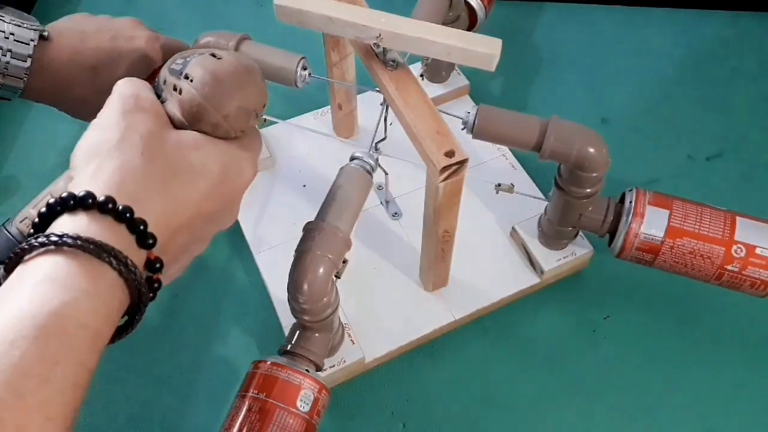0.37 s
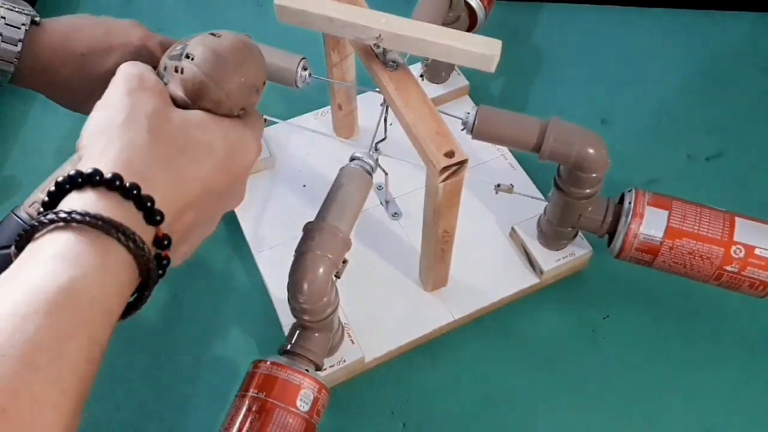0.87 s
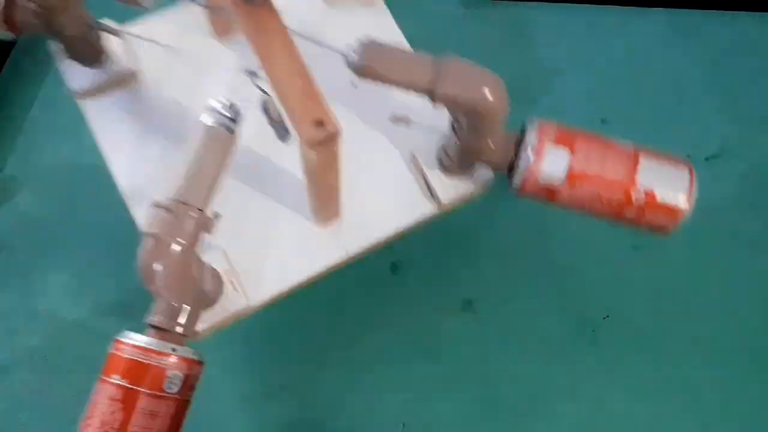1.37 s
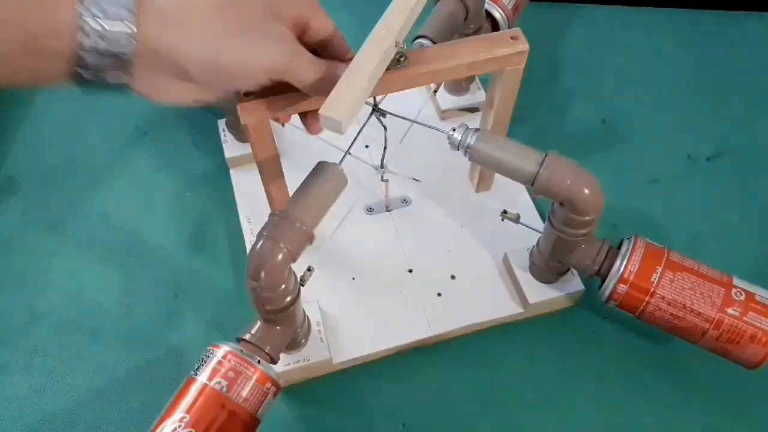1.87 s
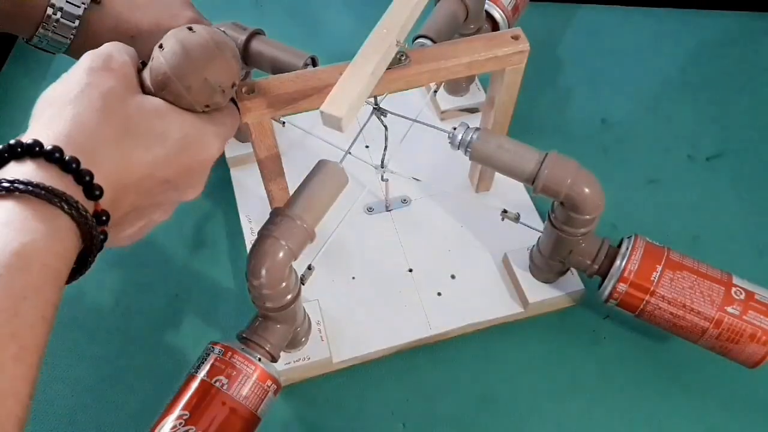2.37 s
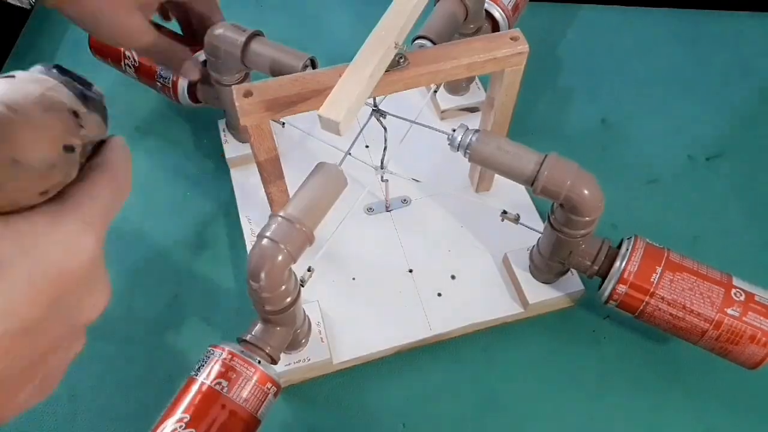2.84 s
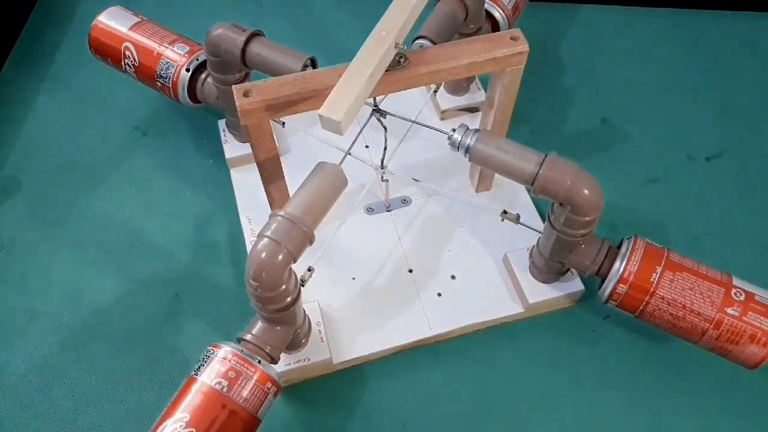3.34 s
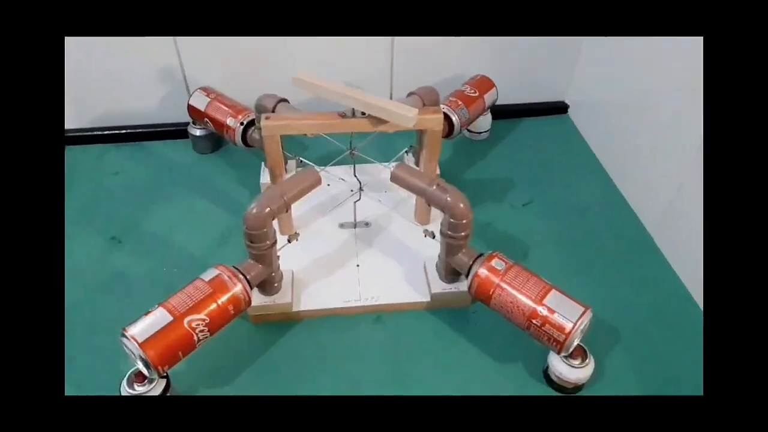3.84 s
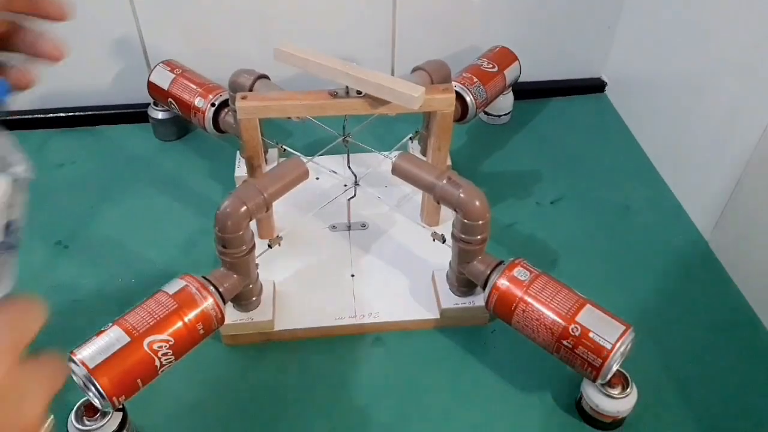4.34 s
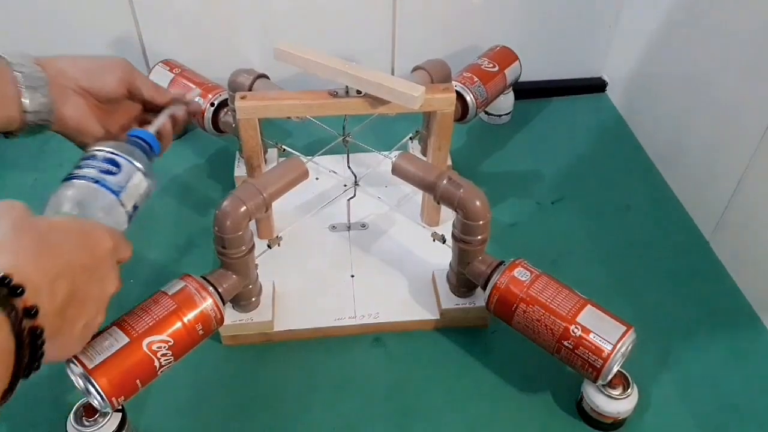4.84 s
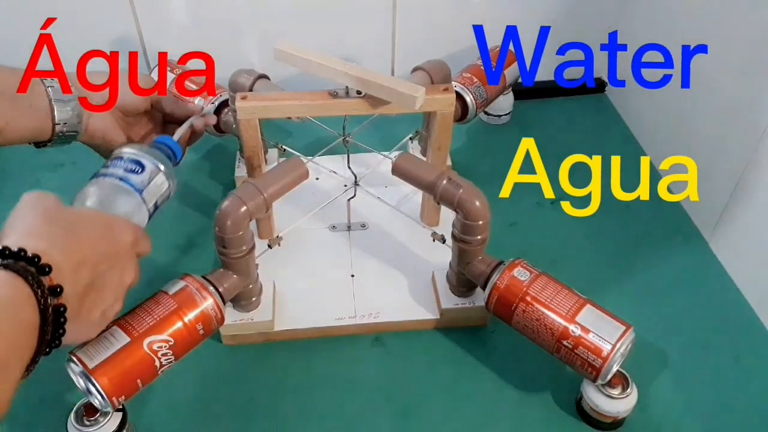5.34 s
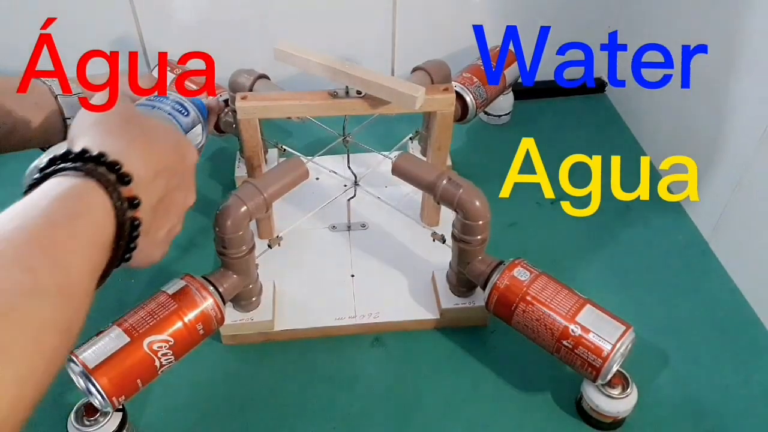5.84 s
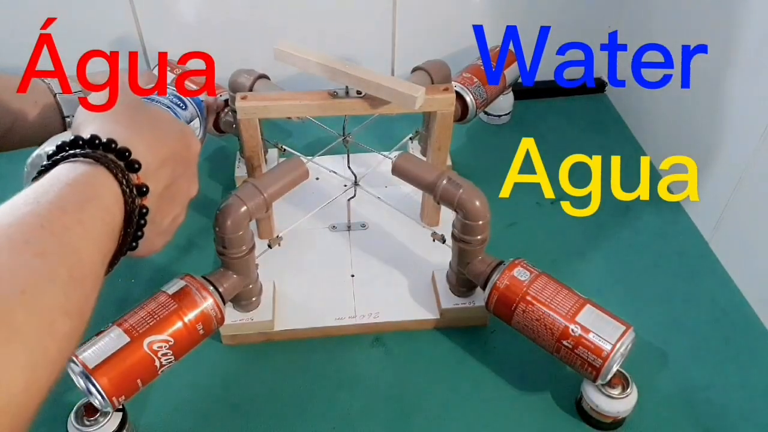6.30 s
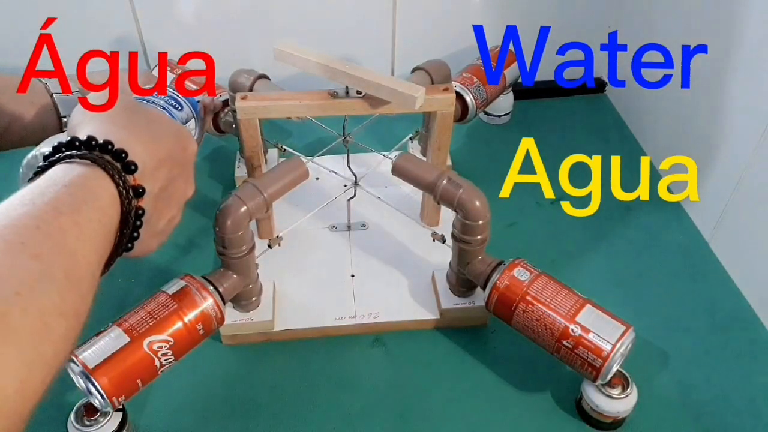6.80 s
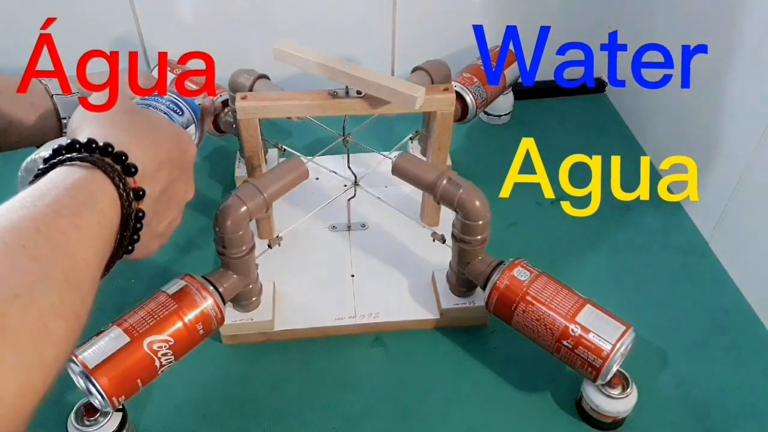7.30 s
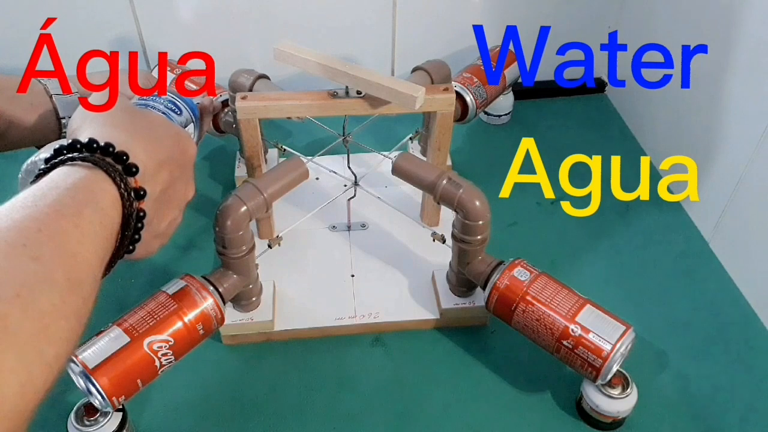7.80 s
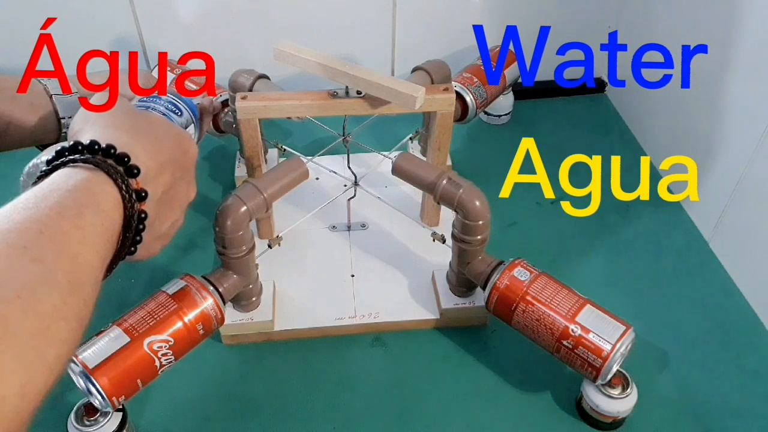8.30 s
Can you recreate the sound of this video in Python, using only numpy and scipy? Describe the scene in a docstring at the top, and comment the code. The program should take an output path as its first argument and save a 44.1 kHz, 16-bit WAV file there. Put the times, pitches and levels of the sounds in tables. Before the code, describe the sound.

A shrill little rotary drill with a gritty, hissing cut works three times close to the microphone, with light handling scuffs between. A blink of complete silence cuts to a steady, faint far machine hum. Thin plastic clicks, crackles and hollow can taps sound in sparse clusters, with a short hard-room tail; one arching, hoarse, distant animal call rises and falls, and a few last clicks follow.

```python
"""A small fast hand drill, already running, works three times at a bench in a hard-walled workshop.
Its whine and cutting noise are summed tones and shaped noise; between bursts, soft noise swells are things being shifted.
After a very short silence a machine hums: regular strokes ring its casing. Over it a thin plastic bottle
crackles and taps a can, made of noise bursts that die away, and far off an animal cries in three gliding tones."""
import sys
import numpy as np
from scipy import signal
from scipy.fft import rfft, irfft, next_fast_len
from scipy.io import wavfile
from scipy.ndimage import uniform_filter1d

SR = 44100
rng = np.random.default_rng(int(sys.argv[2]) if len(sys.argv) > 2 else 0)


def invert_db(x):
    """Field ratio 10**(x/20) for x, a level in decibels (scalar or array-like)."""
    u = np.asarray(x, float) / 20
    return 10 ** u


def materialize(psi):
    """Save the field psi as 16-bit PCM at rate SR to the path in sys.argv[1].

    A 1-D psi becomes a single channel; in a 2-D psi each row is a channel.
    """
    bounded = np.clip(np.atleast_2d(psi).T, -1, 1)
    quanta = np.round(bounded * 32767).astype(np.int16)
    wavfile.write(sys.argv[1], SR, quanta)


N = 371322
T = np.arange(N) / SR
# the short silence: (start [s], end [s], fade [s])
SILENCE = (3.492, 3.522, 0.0018)


def curve(rows, empty=-120.):
    """Draw straight lines through the columns of a table against time."""
    s, *columns = np.transpose(rows)
    return [np.interp(T, s, column, left=empty, right=empty) for column in columns]


def unit(x):
    """Scale a sound to an rms of 1."""
    return x / np.sqrt(np.mean(x ** 2))


def colour(x, points):
    """Make each pitch region louder or softer, by (frequency [Hz], gain [dB]) points."""
    hz, db = np.transpose(points)
    size = next_fast_len(N)
    f = np.maximum(np.arange(size // 2 + 1) * SR / size, 1)
    gain = invert_db(np.interp(np.log(f), np.log(hz), db))
    return irfft(rfft(x, size) * gain, size)[:N]


def band(x, hz, width_hz):
    """Pass a sound through one resonance with gain 1 at its centre."""
    return signal.lfilter(*signal.iirpeak(hz, hz / width_hz, fs=SR), x)


def rough_note(hz, width_hz):
    """Noise through two resonances at one pitch: the narrower they are, the more it sounds like a note."""
    once = band(rng.standard_normal(N), hz, width_hz)
    return unit(band(once, hz, 0.72 * width_hz))


def walk(rate):
    """Random wandering with an rms of 1: levels held for 1 / rate seconds, then smoothed twice."""
    hold = int(SR / rate)
    steps = np.repeat(rng.standard_normal(N // hold + 1), hold)
    smooth = uniform_filter1d(uniform_filter1d(steps, hold), hold)
    return unit(smooth[:N])


def bump(s, length):
    """Smooth swell and fade around the moment s."""
    return np.sin(np.pi * np.clip((T - s) / length + .5, 0, 1)) ** 2


def decay(s, t60):
    """Sudden start at s, then a fade that falls 60 dB in t60 seconds."""
    onset = np.clip((T - s) / 0.00082, 0, 1)
    return np.exp(-np.log(1000) * np.maximum(T - s, 0) / t60) * onset


def ripple(x, t60):
    """Smear a sound with a dense random tail that dies within t60 seconds, at equal power."""
    lag = np.arange(int(t60 * SR)) / SR
    tail = rng.standard_normal(len(lag)) * np.exp(-np.log(1000) * lag / t60)
    return signal.fftconvolve(x, tail / np.linalg.norm(tail))[:N]


def contacts(shapes, levels_db, ranges):
    """Bursts of noise as things touch, each with its own balance of low, middle and high."""
    return sum((invert_db(db) @ shapes) * rough_note(hz, width)
               for db, (hz, width) in zip(np.transpose(levels_db), ranges))


def room_air():
    """Wavering rumble and hiss: shaped noise, with another colour after the silence."""
    # rumble before and after the silence: (time [s], level [dB])
    rumble_before = [(0, -59), (.4, -55), (.7, -61), (.94, -56.5), (1.24, -60.5), (2.3, -59), (2.58, -59),
                     (2.73, -65), (3.1, -61.5), (3.5, -62)]
    rumble_after = [(3.52, -58.5), (3.8, -54), (4.3, -55), (6, -56), (6.35, -55), (6.6, -56), (7.1, -57),
                    (8.42, -56)]
    # balance of the noise before and after: (frequency [Hz], relative level [dB])
    air_before = [(20, -39), (50, -18), (95, -22), (125, -3.5), (280, -5), (600, -21), (1100, -31.5),
                  (2400, -39.5), (3500, -36.5), (3800, -27.5), (4600, -35), (5400, -34.5), (9000, -35),
                  (15500, -45)]
    air_after = [(20, -38.5), (60, -9), (95, -12.5), (180, 0.5), (900, -23.5), (1200, -33), (3500, -38.5),
                 (3800, -25.5), (4700, -28), (5300, -41), (6500, -31.5), (8600, -30), (9300, -38.5),
                 (15500, -34.5)]
    return sum(invert_db(curve(rows)[0] + 1.7 * walk(6)) * unit(colour(rng.standard_normal(N), points))
               for rows, points in zip((rumble_before, rumble_after), (air_before, air_after)))


def far_machine():
    """A far machine: every stroke is a pulse that is smeared and then rings the casing; thin tones join in."""
    stroke_hz = 59.06
    # resonances of the casing: (frequency [Hz], width [Hz], average level [dB])
    casing = [(177, 40, -68), (700, 500, -80), (1300, 500, -93), (3000, 500, -93), (3950, 250, -82),
              (4400, 400, -83), (7100, 500, -89)]
    # thin tones: (multiple of the stroke rate, average level [dB])
    hum_tones = [(3, -63.5), (5, -72), (6, -76), (8, -78), (10, -82), (12, -80.5), (14, -85), (15, -81),
                 (66, -85), (68, -81), (73, -87), (74, -88), (120, -86), (251, -90)]
    # a second, fainter hum: (frequency [Hz], average level [dB])
    drone_notes = [(63.7, -72), (127.5, -71), (255, -67)]
    stroke = np.cumsum(stroke_hz * (1 + 0.00029 * walk(2))) / SR
    pulses = np.diff(np.floor(stroke), prepend=0)
    smeared = ripple(pulses, 0.23)
    hum = sum(invert_db(db + 2.0 * walk(3.7)) * unit(band(band(smeared, hz, width), hz, width))
              for hz, width, db in casing)
    tones = sum(invert_db(db + 3.2 * walk(5)) * np.sqrt(2) * np.sin(2 * np.pi * (k * stroke + rng.random()))
                for k, db in hum_tones)
    drone = sum(invert_db(db + 3.5 * walk(4)) * rough_note(hz, 6.) for hz, db in drone_notes)
    return hum + tones + drone


def far_whines():
    """Faint far whines: narrow noise notes whose levels waver."""
    # (frequency [Hz], average level [dB])
    whine_notes = [(533, -84), (651, -85), (764, -86), (2800, -92), (3780, -86), (4400, -90), (12096, -92)]
    return sum(invert_db(db + 2.5 * walk(12)) * rough_note(hz, hz / 40) for hz, db in whine_notes)


def workshop():
    """Room air throughout, with faint whines before the silence and the far machine after it."""
    return room_air() + np.where(T < SILENCE[0], far_whines(), far_machine())


def scuff():
    """Soft swells of rubbing noise as things are shifted; brightness tilts low against high."""
    # (middle [s], level [dB], brightness [dB], length [s])
    scuffs = [(0.662, -55, -2, .03), (0.76, -55.5, -5, 0.03), (0.772, -63.5, 7.5, 0.013),
              (0.804, -48, 3.5, 0.04), (1.071, -59, -0.5, .05), (1.216, -70, 0.1, .025),
              (1.238, -61, -5.5, 0.063), (1.312, -72, 1, 0.047), (1.747, -80, 4, .03),
              (1.864, -55, 9, 0.048), (1.924, -65, -1, 0.049), (2.125, -69, -3, .012),
              (2.154, -62, 9, 0.014), (2.907, -70.5, 8, 0.037), (3.097, -63.5, 3.5, 0.066),
              (3.133, -47.5, 5, 0.044), (3.163, -67.5, 0, 0.059), (3.241, -64, 3.5, 0.079),
              (5.944, -73, 14, 0.03), (6.042, -78, 11, .04)]
    # low, middle and high: (centre [Hz], width [Hz])
    ranges = [(850, 710), (2800, 7800), (8500, 17000)]
    # added to the low, middle and high range [dB]
    range_db = (-3.5, 1.3, -3)
    levels = [np.add(range_db, (db - bright, db, db + bright)) for s, db, bright, length in scuffs]
    shapes = np.array([bump(row[0], row[-1]) for row in scuffs])
    return contacts(shapes, levels, ranges)


def cry():
    """Three partials of an arching animal call, hoarse at both ends and blurred by distance."""
    # (time [s], pitch [Hz], level [dB])
    call_path = [(6.1, 1270, -84), (6.15, 1290, -64.5), (6.22, 1510, -62), (6.32, 1550, -63),
                 (6.45, 1530, -62.5), (6.56, 1495, -64), (6.65, 1430, -63), (6.73, 1340, -68),
                 (6.8, 1290, -80)]
    # (level at hoarseness 0.15 [dB], change per unit of hoarseness [dB])
    partials = [(-13, -30), (2.5, -13), (-1, 1)]
    clear_from_s, clear_to_s, clearing_s = 6.25, 6.59, .17  # clearest between the first two times
    hz, db = curve(call_path)
    away = np.maximum(np.maximum(clear_from_s - T, T - clear_to_s), 0)
    rough = np.clip(0.214 + away / clearing_s * 0.64, 0, .9)
    # hoarseness makes both pitch and loudness shake
    phase = 2 * np.pi * np.cumsum(np.maximum(hz, 0) * (1 + 0.06 * rough * walk(300))) / SR
    shake = 1 - rough + 1.3 * rough * walk(700)
    voice = sum(invert_db(db + clear + hoarse * (rough - 0.15) + 3.2 * walk(60)) * np.sqrt(2) * np.sin((k + 1) * phase)
                for k, (clear, hoarse) in enumerate(partials))
    call = shake * voice
    return invert_db(-3) * call + invert_db(-5) * ripple(call, .2)


def rustle():
    """Hands and plastic rustle in swells: noise broken into fine grains of uneven size."""
    # (peak [s], level [dB], rise [dB/s], fall [dB/s])
    swell_rows = [(3.68, -73, 50, 70), (4.49, -56, 57, 112), (5.12, -61, 200, 190), (5.82, -60, 52, 110),
                  (6.15, -67, 40, 50)]
    # (frequency [Hz], relative level [dB])
    rustle_colour = [(600, -30), (1300, -0.5), (2200, -11.5), (3400, 2), (8500, -3.5), (10000, -10),
                     (15500, -12.5)]
    grains = rng.standard_normal(N) * invert_db(1.0 * walk(350) + 1.2 * walk(22))
    swells = sum(invert_db(db - np.where(T < s, rise * (s - T), fall * (T - s)))
                 for s, db, rise, fall in swell_rows)
    return swells * unit(colour(grains, rustle_colour))


def snaps():
    """Sharp clicks of bottle and can: thin plastic snaps as quickly fading noise in three ranges."""
    # (time [s], snap in the high range [dB], ring of the thin wall in the middle range [dB])
    clicks = [(3.555, -57.5, -67), (3.5811, -45.5, -50), (3.6665, -48.5, -53), (4.8024, -46, -37),
              (4.8114, -54, -44), (5.0614, -69, -52.5), (5.1143, -72, -56), (5.6022, -54, -48.5),
              (5.6854, -60, -57), (5.6951, -57, -47), (5.701, -60, -46), (5.7146, -62, -42.5),
              (5.7595, -53, -60), (5.7907, -37, -41.5), (5.8266, -25.5, -35.5), (5.844, -50, -59),
              (5.871, -42.5, -48), (5.9359, -58, -49), (6.028, -55, -49), (6.163, -64, -49.5),
              (6.413, -43, -50), (6.8879, -48, -50), (7.2931, -46.5, -53.5)]
    # low, middle and high: (centre [Hz], width [Hz])
    ranges = [(2800, 4600), (7000, 4900), (13500, 5900)]
    body_db, t60_s = -18, 0.028  # low range relative to the snap, and fade time
    levels = [(snap + body_db, ring, snap) for s, snap, ring in clicks]
    shapes = np.array([decay(row[0], t60_s) for row in clicks])
    return contacts(shapes, levels, ranges)


def hollow_taps():
    """Can and bottle ring one rough note and its overtone after each tap."""
    # (time [s], level of the main note [dB], note [Hz], time to fall 60 dB [s])
    tap_rows = [(3.959, -44, 249, 0.081), (4.337, -42.5, 1670, 0.12), (4.804, -47.5, 710, .14),
                (4.814, -46, 4300, 0.095), (5.121, -62, 1290, .15), (5.603, -51, 658, 0.19),
                (5.622, -47, 650, 0.16), (5.778, -56, 2080, 0.061)]
    overtone, overtone_db, sharpness = 1.39, -14.5, 3.7  # pitch ratio, relative level, pitch / width
    out = np.zeros(N)
    for s, db, hz, t60 in tap_rows:
        width_hz = hz / sharpness
        note = rough_note(hz, width_hz) + invert_db(overtone_db) * rough_note(overtone * hz, width_hz)
        out += invert_db(db) * decay(s, t60) * note
    return out


def burst(trigger, bite, ease, release, db):
    """Level in dB of one burst: spin-up, free run, bite, steady cut, easing, run-down, short coast."""
    spin_up_db_per_s, free_db, free_rise_db_per_s = 800, -10, 107  # the free run climbs to free_db
    bite_db, bite_s, settle_s = -2.5, .008, 0.078
    ease_db, run_down_db_per_s, coast_db, coast_s = -5, 878, -33.5, 0.026
    contact = bite - bite_s
    free = free_db - free_rise_db_per_s * max(contact - trigger, 0)
    coast = release + (ease_db - coast_db) / run_down_db_per_s
    rows = [(trigger - .06, free - 0.066 * spin_up_db_per_s),
            (min(trigger, contact), free),
            (contact, free_db),
            (bite, bite_db),
            (bite + settle_s, 0),
            (ease, 0),
            (release, ease_db),
            (coast, coast_db),
            (coast + coast_s, coast_db - 2.5),
            (coast + coast_s + .02, coast_db - 24)]
    return db + curve(rows)[0]


def jolts():
    """Short rough notes as the bit bites, squeaks or jolts the bench and parts are set down or scraped."""
    # (middle [s], level [dB], pitch [Hz], length [s])
    jolt_rows = [(0.484, -52, 110, 0.05), (0.581, -44.5, 816, 0.087), (0.659, -54, 3970, 0.033),
                 (0.661, -54.5, 131, 0.03), (0.764, -53, 1260, 0.056), (0.8, -51, 1610, .03),
                 (1.008, -55, 110.5, 0.066), (1.027, -42, 783, 0.076), (1.239, -56.5, 754, .058),
                 (1.931, -59.5, 736, 0.063), (2.244, -45.5, 1850, 0.059), (2.655, -43, 163, .055),
                 (2.675, -23, 8500, 0.013), (2.767, -43, 6740, 0.044), (2.907, -63, 7270, .03),
                 (5.948, -53.5, 7400, 0.043), (5.95, -62, 5500, .04)]
    return sum(invert_db(db) * bump(s, length) * rough_note(hz, 90 + 0.074 * hz)  # higher notes are wider
               for s, db, hz, length in jolt_rows)


def drill():
    """Whine on multiples of the shaft turn over brush, fan and cutting noise that pulses once a turn."""
    # (trigger [s], bit bites [s], pressure eases [s], release [s], level [dB])
    bursts = [(-.1, -0.005, .504, 0.583, -24), (0.819, 0.826, 1.02, 1.037, -24),
              (2.246, 2.305, 2.681, 2.764, -23.5)]
    # commutator bars, fan blades and bearing balls stand out: (multiple of the turn, relative level [dB])
    whine_rows = [(1, -34.5), (2, -35), (3, -16.5), (11, -25.5), (12, -10.5), (13, -25), (15, -20.5),
                  (16, -21), (17, -21.5), (18, -24.5), (19, -27.5), (20, -32), (21, -26), (22, -26),
                  (23, -22.5), (24, -23), (25, -21), (26, -23), (28, -28.5), (29, -31.5), (31, -17),
                  (32, -29.5), (34, -29), (35, -30), (36, -29.5), (38, -27.5), (39, -32.5), (40, -32),
                  (42, -28), (44, -22), (45, -29.5)]
    # (frequency [Hz], relative level [dB])
    cutting_colour = [(30, -44), (120, -21.5), (220, -35), (340, -21.5), (600, -16.5), (1300, -10),
                      (1900, -10), (2400, -10.5), (2800, -9.5), (4000, -5.5), (5400, -3), (6500, -6.5),
                      (8200, -8), (9300, -13.5), (11000, -14), (15500, -12.5)]
    shaft_hz, full_db = 341.4, -24.5  # below full_db the whine sinks faster than the noise
    db = np.max([burst(*row) for row in bursts], axis=0)
    slack = np.clip(full_db - db, 0, 40)
    turn = 2 * np.pi * np.cumsum(shaft_hz * (1 + .0009 * walk(9))) / SR
    # the tones share four separate flutters
    flutter = [walk(rate) for rate in (25.2, 32.8, 36.9, 43.53)]
    whine = sum(invert_db(d + 2.8 * flutter[k % len(flutter)]) * np.sqrt(2) * np.sin(k * turn + 2 * np.pi * rng.random())
                for k, d in whine_rows)
    chips = rng.standard_normal(N) * invert_db(1.8 * walk(3000) + 1.2 * np.cos(turn) + 0.85 * walk(40))
    # a faint, short random smear makes the noise spectrum uneven
    chips = chips + invert_db(-9) * ripple(chips, .05)
    noise = invert_db(0.4) * unit(colour(chips, cutting_colour))
    return invert_db(db) * (noise + invert_db(-0.5 - 1.8 * slack) * whine)


def scene():
    """Everything sits in the middle; faint noise that differs between left and right follows the room noise and
    scuffs."""
    # duller tail that the hard walls give the taps: (frequency [Hz], relative level [dB])
    walls = [(300, 0), (5000, 0), (8000, -2), (15000, -8)]
    # faint left-right difference: (frequency [Hz], level before a 6 dB lift [dB])
    side_colour = [(60, -42), (300, -36), (700, -24), (1300, -20), (4000, -22), (7000, -17), (15000, -10)]
    hits = snaps() + hollow_taps()
    around = scuff() + workshop()
    wall_tail = invert_db(-3) * colour(ripple(hits, 0.46), walls)
    centre = drill() + jolts() + hits + wall_tail + rustle() + cry()
    side = invert_db(6.0) * colour(ripple(around, .06), side_colour)
    start, end, fade = SILENCE
    gate = np.clip(np.maximum(start - T, T - end) / fade, 0, 1)
    return (centre + around + np.array([side, -side])) * gate


def top_cut(x):
    """Nothing passes above the cut-off."""
    return signal.sosfilt(signal.butter(12, 15970, fs=SR, output="sos"), x)


def record(dry):
    """A steep filter removes the treble above 15.1 kHz."""
    top = signal.ellip(6, .2, 40, 15100, fs=SR, output="sos")
    finished = signal.sosfilt(top, dry)
    return top_cut(finished)


dry = scene()
out = record(dry)
materialize(out)
```